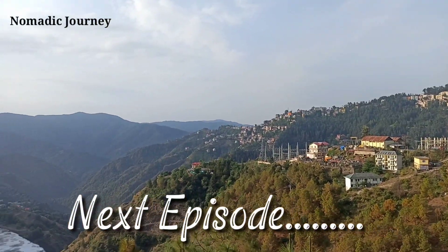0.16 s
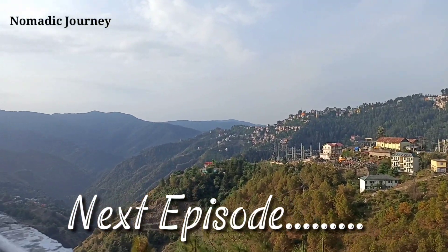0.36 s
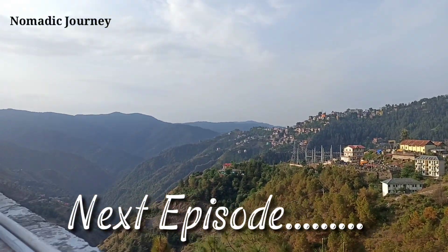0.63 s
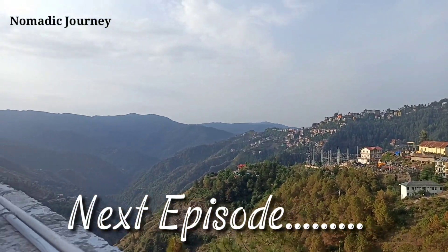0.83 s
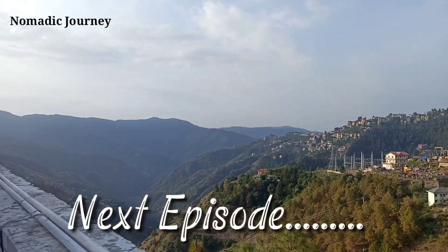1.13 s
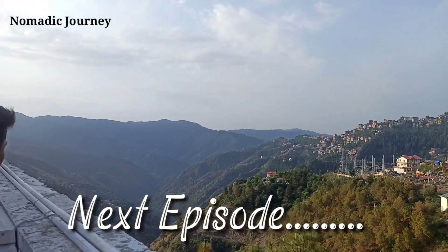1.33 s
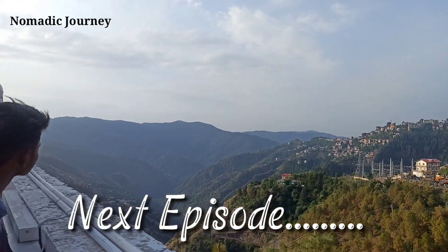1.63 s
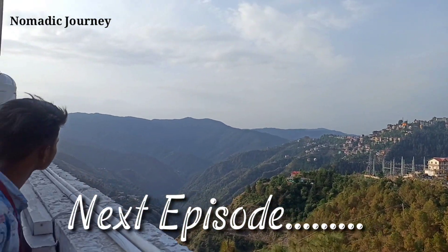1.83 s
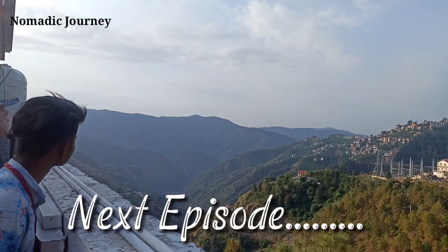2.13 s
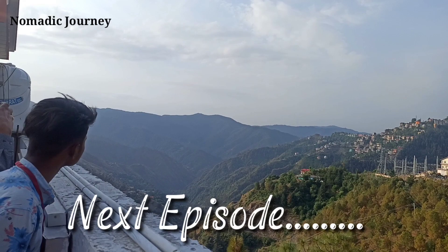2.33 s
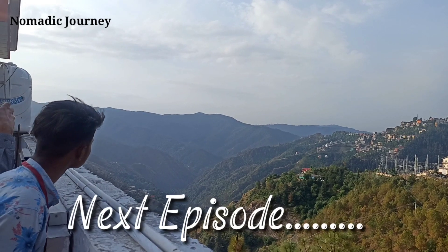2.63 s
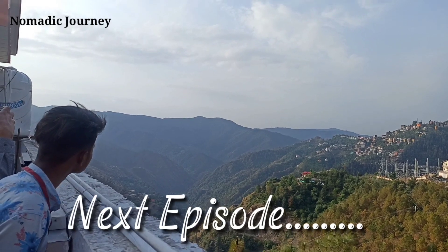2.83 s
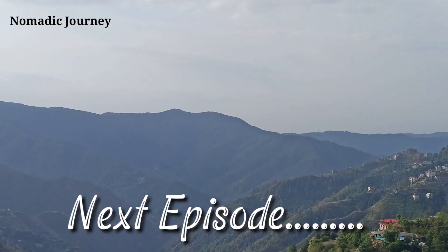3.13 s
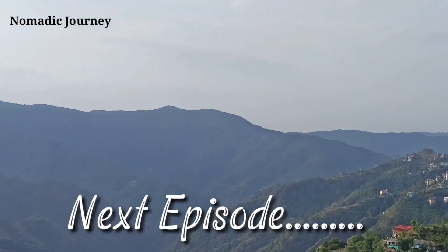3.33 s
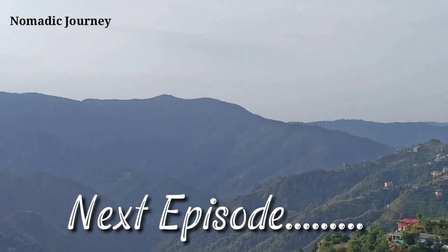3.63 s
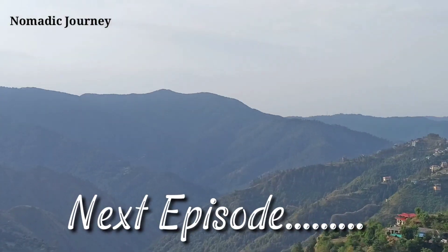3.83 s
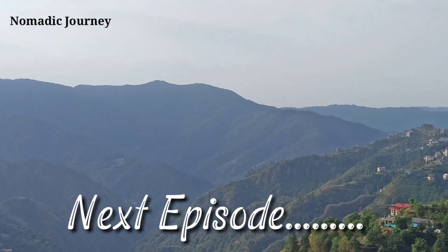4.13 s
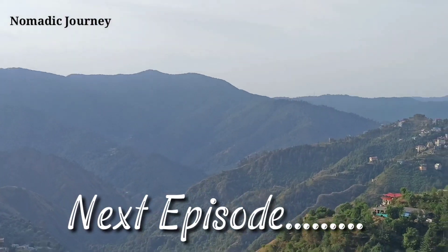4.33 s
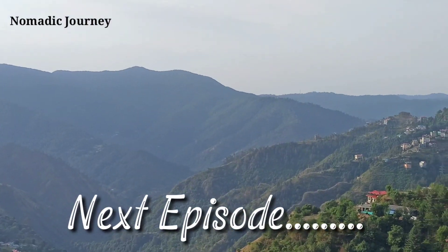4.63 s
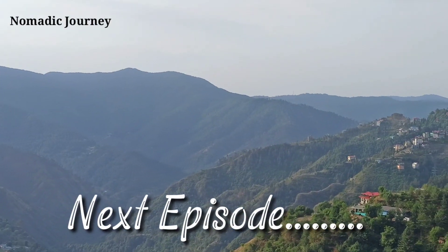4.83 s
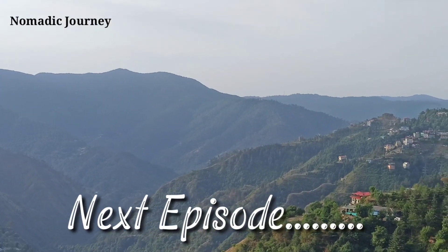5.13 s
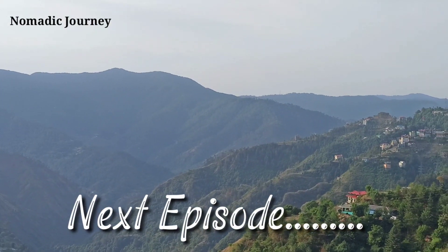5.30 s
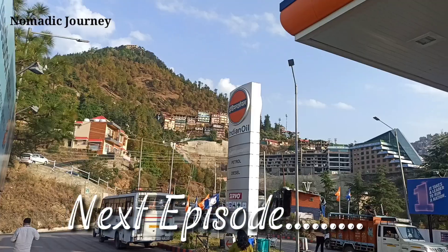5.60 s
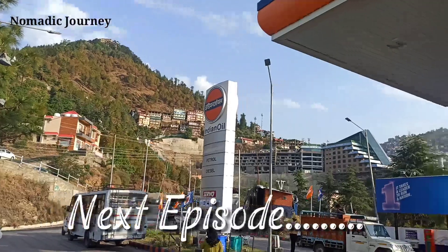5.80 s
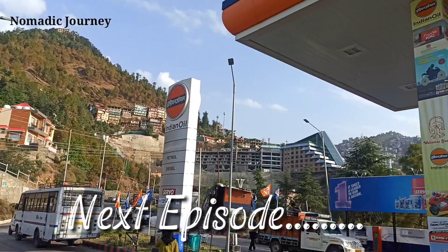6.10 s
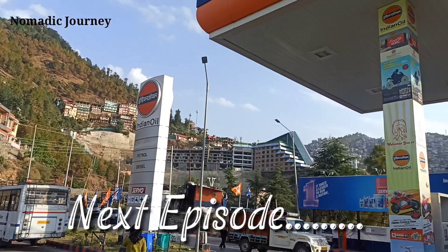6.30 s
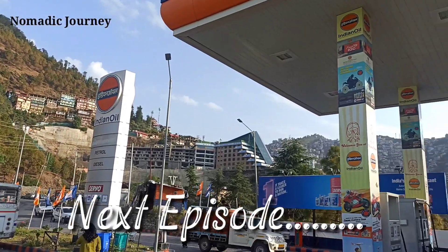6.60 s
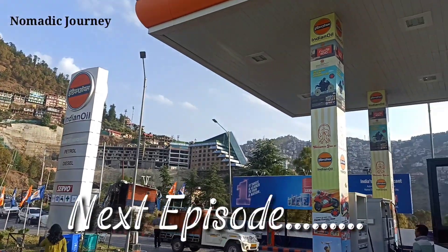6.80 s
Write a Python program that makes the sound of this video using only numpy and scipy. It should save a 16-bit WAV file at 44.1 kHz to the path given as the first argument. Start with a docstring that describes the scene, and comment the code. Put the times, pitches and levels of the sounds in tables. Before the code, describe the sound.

A diesel engine idles with a low hum while birds chirp; after an abrupt cut, heavier droning and diesel clatter take over.

```python
"""Idling diesels: hillside terrace and filling station

A six-cylinder diesel idles below a terrace, its exhaust harmonics beating against a second hum; birds
chirp and a far vehicle speeds up. The terrace cuts off abruptly and a filling station fades in: a heavy
engine drones, a lighter diesel clatters as its firings excite the block, and birds call."""
import sys
import numpy as np
from scipy import signal
from scipy.fft import rfft, irfft, next_fast_len
from scipy.io import wavfile
from scipy.ndimage import uniform_filter1d, map_coordinates

SR = 44100
rng = np.random.default_rng(int(sys.argv[2]) if len(sys.argv) > 2 else 0)


def unload_wav(signal):
    """Save mono or channel-first audio to the path in sys.argv[1] as 16-bit WAV at rate SR, clipped to [-1, 1]."""
    wavfile.write(
        sys.argv[1],
        SR,
        np.round(np.clip(np.atleast_2d(signal).T, -1, 1) * 32767).astype(np.int16),
    )


N = 306495
T = np.arange(N) / SR


def gain_of(db):
    """Amplitude ratio of a level in decibels."""
    return 10 ** (np.asarray(db) / 20)

def unit_rms(x):
    """Normalisation to unit power."""
    return x / np.sqrt(np.mean(x ** 2) + 1e-20)

def bell(at_s, width_s):
    """Gaussian envelope of height 1."""
    return np.exp(-((T - at_s) / width_s) ** 2)

def drift(hz):
    """Slow modulation at rms 1: sinusoids of random phase superposed, up to hz."""
    t, rates = T[::100], hz * np.geomspace(.1, 1, 20)
    slow = np.sin(2 * np.pi * (rates[:, None] * t + rng.random((20, 1)))).sum(0)
    return np.interp(T, t, unit_rms(slow))

def tremor(hz):
    """Fast modulation at rms 1: noise low-passed at hz."""
    return unit_rms(signal.sosfilt(signal.butter(4, hz, fs=SR, output="sos"), rng.standard_normal(N)))

def coloured(x, spectrum, resonances=()):
    """Filtering by a spectral envelope with Lorentzian peaks; the result has rms 1."""
    hz, db = np.transpose(spectrum)
    size = next_fast_len(N)
    f = np.fft.rfftfreq(size, 1 / SR)
    shape_db = np.interp(np.log(f + 1), np.log(hz), db)
    shape_db += sum(lift / (1 + (2 * (f - at) / width) ** 2) for at, width, lift in resonances)
    return unit_rms(irfft(rfft(x, size) * gain_of(shape_db), size)[:N])


def exhaust(firing_hz, orders, swell_s, waver):
    """Periodic firing gives a harmonic series; weak orders waver more than the pipe's main note."""
    turns = firing_hz * (T - swell_s)
    top_db = max(db for _, db in orders)
    out = np.zeros(N)
    for order, db in orders:
        weak = db < top_db
        unrest = waver * (1 if weak else .1)
        phase = 2 * np.pi * (order * turns + weak * rng.random()) + unrest * drift(4)
        out += gain_of(db) * (1 + unrest * drift(3.8)) * np.cos(phase)
    return np.sqrt(2) * out

def beating_hum(hz, swell_s, db, waver):
    """A second machine just below the exhaust note: the two beat, adding in phase near swell_s."""
    amplitude = np.sqrt(2) * gain_of(db) * (1 + waver * drift(1.1))
    return amplitude * np.cos(2 * np.pi * hz * (T - swell_s) + waver * drift(3.5))

def clatter(firing_hz, block, cylinders, knock, ring_s, jitter_s):
    """Impact excitation: each cylinder knocks in its own way, repeating with every engine cycle."""
    count = len(cylinders)
    firings = firing_hz * (T + jitter_s * drift(6)) % count
    pattern = rng.standard_normal(int(count * SR / firing_hz) + 2)
    rattle = map_coordinates(pattern, [firings * SR / firing_hz], order=3, mode="wrap")
    age = (firings % 1) / firing_hz / ring_s
    blows = gain_of(cylinders)[firings.astype(int) % count] * age * np.exp(1 - age)  # rings up, dies
    return coloured(rattle * (1 + knock * blows), block)

# Exhaust harmonics: order, level/dB before settling
IDLE_HARMONICS = [(1, -65), (2, -33), (3, -47.5), (4, -61), (5, -59), (6, -60), (7, -67), (8, -66),
                  (10, -70), (11, -66.5), (12, -67.5)]
# Spectral envelope of the block: f/Hz, relative level/dB
IDLE_BLOCK_SPECTRUM = [(50, -12), (110, 8), (280, -2.5), (420, 4.5), (550, -8), (720, -6), (1000, -24.5),
                       (1380, -17), (1750, -15.5), (2250, -17), (3200, -19), (6000, -52), (10000, -79.5)]
# Cylinder knocks in firing order: relative level/dB
IDLE_KNOCKS = [9, -0.5, -3.5, -4, -10.5, 0.5]

def idling_diesel():
    """Six cylinders drive exhaust and block; the exhaust settles exponentially and beats with a hum."""
    firing_hz, swell_s = 47.85, .082
    settling = gain_of(-1.2 + 2.5 * np.exp(-T / 2.2))
    hum = settling * exhaust(firing_hz, IDLE_HARMONICS, swell_s, waver=.095)
    hum += beating_hum(85.8, swell_s, db=-48.5, waver=.14)
    block = clatter(firing_hz, IDLE_BLOCK_SPECTRUM, IDLE_KNOCKS, knock=1, ring_s=.0036, jitter_s=99e-6)
    return hum + gain_of(-60.5) * block

# Exhaust harmonics: order, level/dB
HEAVY_HARMONICS = [(2, -63), (4, -44), (5, -58.5), (6, -55.5), (8, -59.5), (10, -63), (12, -60.5)]

def heavy_engine():
    """A harmonic drone whose fourth order beats against a second machine."""
    firing_hz, swell_s = 33.925, 5.915
    drone = exhaust(firing_hz, HEAVY_HARMONICS, swell_s, waver=.099)
    return drone + beating_hum(122.7, swell_s, db=-48, waver=.11)

# Spectral envelope of the block: f/Hz, relative level/dB
LIGHT_BLOCK_SPECTRUM = [(50, -9), (120, 4.5), (450, 3.5), (700, 0), (860, 4.5), (1080, -6.5), (1400, -4),
                        (1750, -8), (2350, -6.5), (3400, -14), (4500, -17), (5200, -26), (7500, -17),
                        (8400, -27), (9000, -45), (12000, -83)]
# Cylinder knocks in firing order: relative level/dB
LIGHT_KNOCKS = [1.5, -.5, -2, 2]
# Modes of the metal: f/Hz, level/dB, decay time/s
METAL_MODES = [(1180, -55.5, .018), (1400, -50.5, .018), (1760, -57.5, .015), (2330, -54.5, .026),
               (2690, -50.5, .014), (2830, -56.5, .026)]

def light_diesel():
    """Four cylinders clatter; once a cycle the hardest knock excites damped modes of the metal."""
    firing_hz, rise_s, uneven_db = 28.35, .003, 2
    block = clatter(firing_hz, LIGHT_BLOCK_SPECTRUM, LIGHT_KNOCKS,
                    knock=1.05, ring_s=.0036, jitter_s=30e-6)
    age = (firing_hz * T - np.argmax(LIGHT_KNOCKS)) % len(LIGHT_KNOCKS) / firing_hz
    ring = np.zeros(N)
    for hz, db, decay_s in METAL_MODES:
        envelope = gain_of(db + uneven_db * drift(4)) * np.exp(-age / decay_s)
        ring += envelope * np.sin(2 * np.pi * (hz * age + rng.random()))
    return gain_of(-45.9) * block + np.minimum(age / rise_s, 1) * ring


def progress(length):
    """Normalised time, 0 to 1 over a note."""
    return np.linspace(0, 1, round(length * SR), endpoint=False)

def cheep(start, length, top_hz, db, rasp):
    """A parabolic frequency arch with a late top."""
    u = progress(length)
    scoop, top_at = .066, .58
    hz = top_hz * (1 - scoop * (1 - u / top_at) ** 2)
    return start, hz, gain_of(db) * np.sqrt(np.sin(np.pi * u)), rasp

def swoop(start, length, foot_hz, top_hz, climb_db, top_db, drop_db, rasp):
    """A frequency sweep: a climb, a top that sags in pitch and level, and a quicker drop."""
    u = progress(length)
    rise, fall, edge_s = .35, .23, .0034
    top_end = 1 - fall
    sag = np.sin(np.pi * np.clip((u - rise) / (top_end - rise), 0, 1)) ** 2
    height = np.minimum((u / rise) ** 2, ((1 - u) / fall) ** 3).clip(max=1) - .14 * sag
    stages = [0, rise * .6, rise, top_end, top_end + fall / 3, 1 - fall / 2, 1]
    db = np.interp(u, stages, [climb_db - 6, climb_db, top_db, top_db, drop_db, drop_db, drop_db - 6])
    edges = np.minimum(np.minimum(u, 1 - u) * length / edge_s, 1)
    return start, foot_hz + (top_hz - foot_hz) * height, edges * gain_of(db - 6 * sag), rasp

def glide(start, length, start_hz, end_hz, db, rasp):
    """A linear frequency sweep."""
    u = progress(length)
    return start, start_hz + (end_hz - start_hz) * u, gain_of(db) * np.sqrt(np.sin(np.pi * u)), rasp

def bird_voice(notes, flutter_db, overtone_db):
    """Random frequency and amplitude modulation make a whistle and its octave raspy."""
    out = np.zeros(N)
    shake, flutter = tremor(380), tremor(130)
    for start, hz, strength, rasp in notes:
        on = round(start * SR) + np.arange(len(hz))
        phase = 2 * np.pi * np.cumsum(hz * (1 + rasp * shake[on])) / SR
        swell = np.sqrt(2) * strength * gain_of(flutter_db * np.tanh(flutter[on]))
        out[on] += swell * (np.sin(phase) + gain_of(overtone_db) * np.sin(2 * phase))
    return out

def scattered(x, wet_db, t60):
    """Scattering from walls and trees adds sparse, exponentially decaying echoes."""
    t = T[:SR // 2]
    taps = rng.standard_normal(len(t)) * (rng.random(len(t)) < 2000 / SR)
    taps *= (t > .008) * gain_of(-60 * t / t60)
    return x + gain_of(wet_db) * signal.fftconvolve(x, taps / np.linalg.norm(taps))[:N]

# Swooping calls: t/s, duration/s, foot f/Hz, top f/Hz, climb level/dB, top level/dB, drop level/dB
NEAR_SWOOPS = [(1.681, 0.14, 1880, 3000, -51, -68, -50.5), (1.984, 0.12, 2220, 2900, -53, -67, -63),
               (3.007, 0.097, 2760, 4060, -53, -49.5, -50.5), (3.157, 0.075, 2780, 3600, -55, -63, -58),
               (6.09, .072, 4150, 4800, -52, -62, -51), (6.645, 0.068, 4050, 4500, -53, -62, -51),
               (6.734, 0.058, 3990, 4480, -50, -49.5, -50)]
# Thin sliding notes: t/s, duration/s, start f/Hz, end f/Hz, level/dB
NEAR_GLIDES = [(0.126, .115, 3280, 4320, -65.5), (0.33, 0.055, 3900, 3670, -66.5),
               (1.229, 0.035, 4300, 3900, -60), (2.795, 0.072, 4230, 3940, -61.5),
               (2.846, .028, 2896, 3280, -55.5), (3.412, 0.071, 4200, 3910, -62.5),
               (3.508, 0.069, 2740, 3270, -59), (4.524, 0.053, 4000, 3580, -63.5)]
# Arched calls: t/s, duration/s, top f/Hz, level/dB, rasp (relative frequency deviation)
FAR_CHEEPS = [(0.06, 0.069, 4040, -58.5, 0.0085), (0.207, 0.064, 4350, -65.5, .015),
              (0.569, 0.077, 4660, -54.5, 0.025), (0.8, .057, 4730, -57, .018),
              (0.932, 0.11, 4610, -57, 0.017), (1.088, 0.057, 4565, -52, 0.019),
              (2.741, 0.042, 4640, -56, 0.043), (2.774, 0.026, 3200, -59.5, 0.039),
              (2.925, 0.05, 4630, -54, 0.02), (2.972, 0.031, 2930, -58, 0.035),
              (3.602, 0.091, 3280, -62.5, 0.045), (3.682, 0.048, 4650, -52.5, 0.025),
              (4.49, 0.04, 4630, -51.5, 0.027), (4.56, 0.059, 4730, -47.5, 0.012),
              (4.604, 0.042, 4760, -50, .016), (4.62, 0.05, 4520, -59, .03),
              (4.588, 0.038, 3130, -56, 0.04), (4.666, 0.039, 3130, -60, .04),
              (4.997, 0.038, 3010, -61.5, .02)]
# Hoarse, falling chips across the station: t/s, duration/s, start f/Hz, level/dB
FARTHEST_CHIPS = [(6.11, 0.022, 6420, -53.5), (6.207, 0.016, 6950, -50), (6.34, 0.026, 6850, -53.5),
                  (6.663, 0.03, 5900, -52.5)]

def birds():
    """The ratio of reverberant to direct sound grows with a bird's distance."""
    calls = [swoop(*row, rasp=.025) for row in NEAR_SWOOPS]
    calls += [glide(*row, rasp=.036) for row in NEAR_GLIDES]
    chips = [glide(t, length, hz, .94 * hz, db, rasp=.045) for t, length, hz, db in FARTHEST_CHIPS]
    near = bird_voice(calls, flutter_db=5.5, overtone_db=-42)
    far = bird_voice([cheep(*row) for row in FAR_CHEEPS], flutter_db=5, overtone_db=-38)
    farthest = bird_voice(chips, flutter_db=5, overtone_db=-42)
    return (scattered(near, wet_db=-6, t60=.25) + scattered(far, wet_db=-5.5, t60=.43)
            + scattered(farthest, wet_db=-3.5, t60=.5))


# Engine harmonics: order, relative level/dB
VEHICLE_HARMONICS = [(2, -4), (3, 0), (4, -3)]

def far_vehicle():
    """Harmonics sweep through the pipe's resonance as the engine gathers speed, spurts and lets go."""
    start_s, end_s, attack_s, release_s = 1.1, 2.14, .9, .04
    pipe_hz, bandwidth_hz = 174, 110
    t = np.clip(T, start_s, end_s)
    spurt_hz = 7.3 * np.exp((t - end_s) / .085)
    hz = 48.5 + 6 * (t - start_s) + spurt_hz
    turns = np.cumsum(hz) / SR
    note = np.zeros(N)
    for order, db in VEHICLE_HARMONICS:
        pipe = 1 / np.hypot(1, 2 * (order * hz - pipe_hz) / bandwidth_hz)
        note += gain_of(db) * pipe * (1 + .094 * drift(17)) * np.sin(2 * np.pi * order * turns)
    effort = np.clip(np.minimum((T - start_s) / attack_s, 1 + (end_s - T) / release_s), 0, 1)
    return np.sqrt(2) * gain_of(-48.3) * effort * note

def puff(peak_s, db, hz, width_hz, rise_s, decay_s):
    """Band-limited noise with exponential rise and decay."""
    out = np.zeros(N)
    on = (T > peak_s - 6 * rise_s - .05) & (T < peak_s + 6 * decay_s + .05)
    edges = np.clip([hz - width_hz / 2, hz + width_hz / 2], 20, SR / 2 - 20)
    band = signal.butter(4, edges, "band", fs=SR, output="sos")
    noise = unit_rms(signal.sosfilt(band, rng.standard_normal(N)[on]))
    age = T[on] - peak_s
    out[on] = gain_of(db) * noise * np.exp(-np.maximum(-age / rise_s, age / decay_s))
    return out

# Sharp ticks: t/s, level/dB, centre f/Hz
CLOSE_TICKS = [(.305, -61, 4660), (1.357, -69, 9400), (1.368, -67, 9400), (3.54, -53, 1750),
               (3.54, -65, 9800), (3.623, -52, 4930), (3.642, -47.5, 1750), (5.087, -49, 5200)]
# Thin swishes: t/s, level/dB, rise time/s, decay time/s
HIGH_SWISHES = [(.015, -71.5, .03, .1), (.4, -75, .04, 0.052), (.51, -72, .02, 0.018),
                (.61, -75.5, .03, 0.028), (2.22, -79, 0.088, 0.068), (3.04, -73.5, 0.048, 0.039),
                (3.47, -76, .05, 0.045), (3.63, -74, 0.061, 0.06), (4.4, -72, .015, .015),
                (4.76, -73.5, .02, .024), (5.075, -63, 0.023, 0.025)]

def scuffs():
    """Noise transients close by: ticks, high swishes and one duller scuff."""
    ticks = sum(puff(*row, width_hz=1260, rise_s=.00083, decay_s=.0051) for row in CLOSE_TICKS)
    swishes = sum(puff(t, db, hz=9800, width_hz=3000, rise_s=rise, decay_s=decay)
                  for t, db, rise, decay in HIGH_SWISHES)
    return ticks + swishes + puff(.012, db=-46, hz=1400, width_hz=2100, rise_s=.022, decay_s=.039)

# Soft rustles: peak t/s, half duration/s, level/dB, centre f/Hz
RUSTLE_SWELLS = [(1.749, 1, -59, 2288), (2.45, .5, -72, 5320), (3.152, 0.44, -62.5, 1081),
                 (3.346, 0.53, -68.5, 3600), (3.549, 0.15, -67.5, 5230), (3.599, 0.92, -64.5, 1745),
                 (5.401, 1, -63.5, 2078)]

def rustle(width_hz=920, darken_hz_per_s=380):
    """Noise on a falling carrier: bands that darken as they swell and sink."""
    noise = rng.standard_normal(N) + 1j * rng.standard_normal(N)
    band = signal.sosfilt(signal.butter(2, width_hz / 2, fs=SR, output="sos"), noise)
    out = np.zeros(N)
    for peak_s, half_length, db, hz in RUSTLE_SWELLS:
        carrier = np.exp(2j * np.pi * np.cumsum(hz - darken_hz_per_s * (T - peak_s)) / SR)
        shifted = (np.roll(band, rng.integers(N)) * carrier).real
        out += gain_of(db) * bell(peak_s, half_length) * unit_rms(shifted)
    return out

# Spectral lines of other machines and ringing panels: f/Hz, level/dB
TERRACE_LINES = [(25.9, -64), (103.7, -60.5), (295, -68), (343, -65.5), (375, -68.5), (534.3, -66),
                 (548, -72.5), (1348, -72), (13168, -103), (13361, -103)]
STATION_LINES = [(594, -57.5), (797, -58.5), (615, -70), (964, -61.5), (1374, -60.5), (1480, -70)]

def machine_tones(lines, waver):
    """Steady vibration gives a line spectrum, here with slight phase modulation."""
    return np.sqrt(2) * sum(
        gain_of(db) * np.sin(2 * np.pi * (hz * T + rng.random()) + waver * drift(3.3))
        for hz, db in lines)

def air(spectrum, resonances, patchy_db, flicker_db):
    """Broadband noise modulated in time and frequency: patches drift and the treble flickers."""
    hz, _, z = signal.stft(rng.standard_normal(N), SR, nperseg=512, noverlap=384)
    across_frequency = uniform_filter1d(rng.standard_normal(z.shape), 8, 0)
    patches = unit_rms(uniform_filter1d(across_frequency, 22, 1))
    flicker = unit_rms(uniform_filter1d(rng.standard_normal(z.shape[1]), 10))
    treble = (hz / (hz + 1000))[:, None]
    z *= gain_of(treble * (patchy_db * patches + flicker_db * flicker))
    return coloured(signal.istft(z, nperseg=512, noverlap=384)[1][:N], spectrum, resonances)

# Dips in the hiss: deepest t/s, half duration/s, centre f/Hz, slide/(Hz/s), gain/dB
HISS_NOTCHES = [(.45, 0.53, 1610, -100, -5), (.48, 0.29, 3950, -1100, -6), (1.903, 0.54, 4740, -1400, -2.5),
                (2.53, 0.13, 2980, -1400, -5), (4.198, 0.2, 2930, 201, -6), (5.35, 0.36, 3130, 150, -4)]

def hollowed(x, relative_width=.11):
    """Shallow, sliding Gaussian notches make the sound hollow here and there."""
    hz, t, z = signal.stft(x, SR, nperseg=1024, noverlap=768)
    for at_s, half_length, centre_hz, slide, db in HISS_NOTCHES:
        detuning = (hz[:, None] - centre_hz - slide * (t - at_s)) / (relative_width * centre_hz)
        z *= gain_of(db * np.exp(-detuning ** 2 - ((t - at_s) / half_length) ** 2))
    return signal.istft(z, nperseg=1024, noverlap=768)[1][:N]

# Distant traffic and open air: f/Hz, relative level/dB
VALLEY_SPECTRUM = [(30, -20.5), (65, 7.5), (150, 1), (300, -4.5), (600, -13), (950, -21.5), (1400, -18.5),
                   (1800, -22), (2500, -19.5), (3150, -19), (3400, -26), (4100, -22), (4500, -21),
                   (5900, -29), (6150, -49), (7000, -54.5), (8000, -54.5), (8200, -42), (9200, -40.5),
                   (11850, -43), (12100, -62), (15500, -70)]
# Resonances in the hiss: f/Hz, bandwidth/Hz, gain/dB
VALLEY_RESONANCES = [(1330, 95, 3), (1468, 100, 7), (2247, 58, 9.5), (4420, 170, 6.5), (4750, 59, 4.5),
                     (5240, 56, 9)]

def valley_air(firing_hz=47.85):
    """Ambient noise whose hiss is amplitude-modulated by the diesel's firings and dips once."""
    valley = gain_of(-50) * air(VALLEY_SPECTRUM, VALLEY_RESONANCES, patchy_db=2, flicker_db=.6)
    low = signal.sosfiltfilt(signal.butter(2, 900, fs=SR, output="sos"), valley)
    puffing = unit_rms(1 + .5 * np.cos(np.pi * firing_hz * T) ** 8)
    hiss_db = 2 - bell(.59, width_s=.41)
    return low + hollowed(valley - low) * puffing * gain_of(hiss_db)

# Distant traffic and open air: f/Hz, relative level/dB
STATION_SPECTRUM = [(30, -24), (110, 1.5), (300, -7.5), (800, -1), (1200, -10), (2500, -6), (4600, -16),
                    (4900, -19), (7400, -18.5), (9000, -45), (11300, -50), (11700, -32), (15500, -33.5)]
# Resonances in the hiss: f/Hz, bandwidth/Hz, gain/dB
STATION_RESONANCES = [(2660, 340, 1.5), (4550, 750, 7.5), (6480, 430, 7.8)]

def station_air():
    """Ambient noise with a continuous spectrum and three treble resonances."""
    return gain_of(-49) * air(STATION_SPECTRUM, STATION_RESONANCES, patchy_db=1.5, flicker_db=2)


def scene():
    """Superposition: the terrace stops dead, then the station fades in and keeps growing a little."""
    cut_s, fade_start_s, fade_s, growth_db_per_s = 5.626, 5.711, .205, .84
    terrace = idling_diesel() + far_vehicle() + scuffs() + rustle()
    terrace += machine_tones(TERRACE_LINES, waver=.41) + valley_air()
    station = heavy_engine() + light_diesel() + machine_tones(STATION_LINES, waver=.32) + station_air()
    cut = np.clip((cut_s - T) / .00025, 0, 1)
    since = T - fade_start_s
    fade_in = np.clip(since / fade_s, 0, 1) * gain_of(growth_db_per_s * since)
    return (cut * terrace + fade_in * station + birds())[None]

def record(dry):
    """Band limiting by a linear-phase low-pass filter at 15.5 kHz."""
    low_pass = signal.firwin(511, 15500, window=("kaiser", 9), fs=SR)
    return signal.oaconvolve(dry, low_pass[None], "same")


dry = scene()
out = record(dry)
unload_wav(out)
```